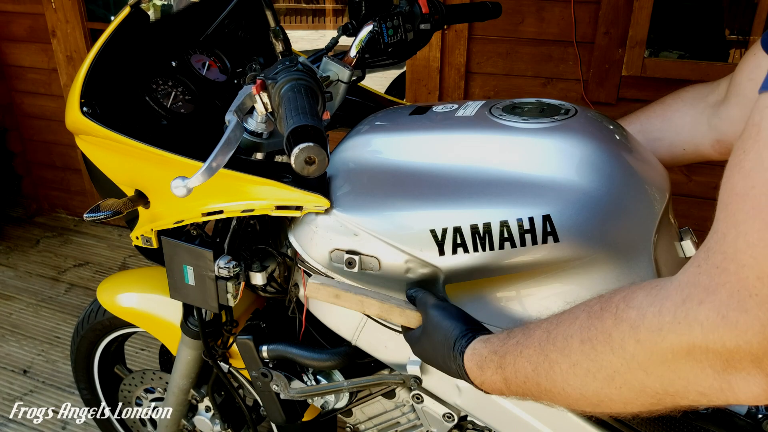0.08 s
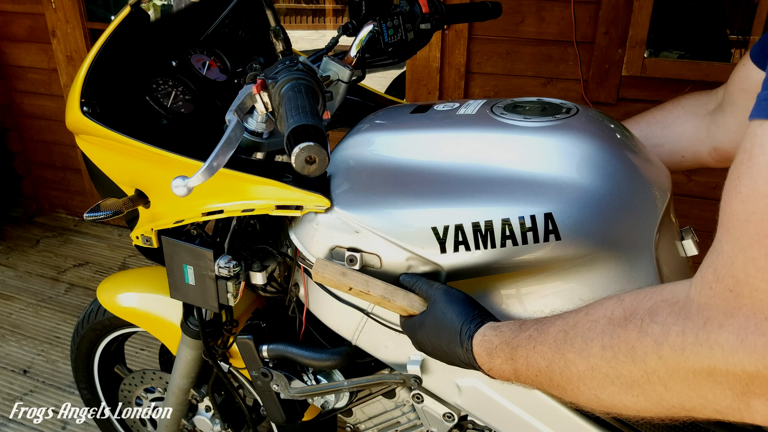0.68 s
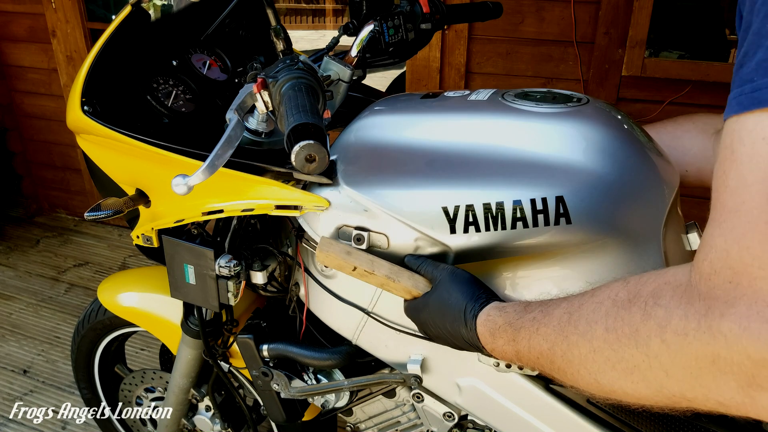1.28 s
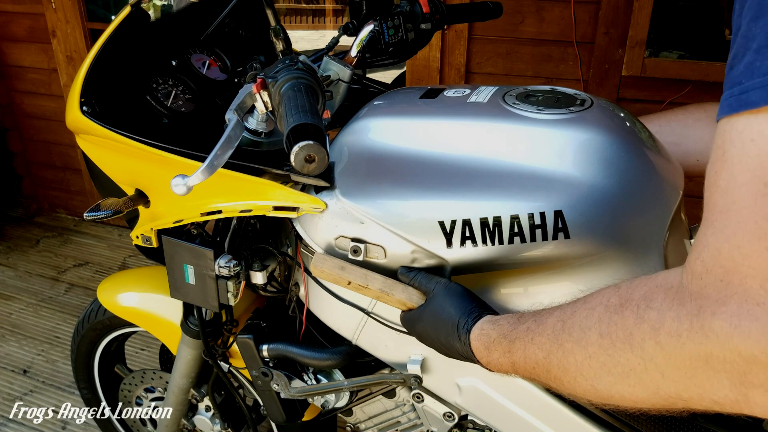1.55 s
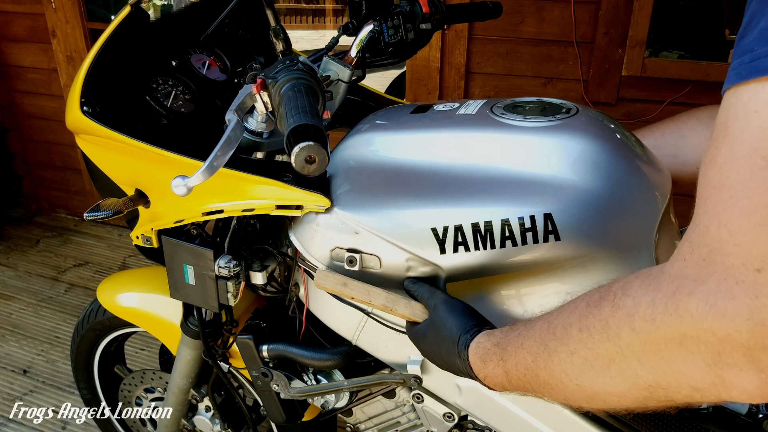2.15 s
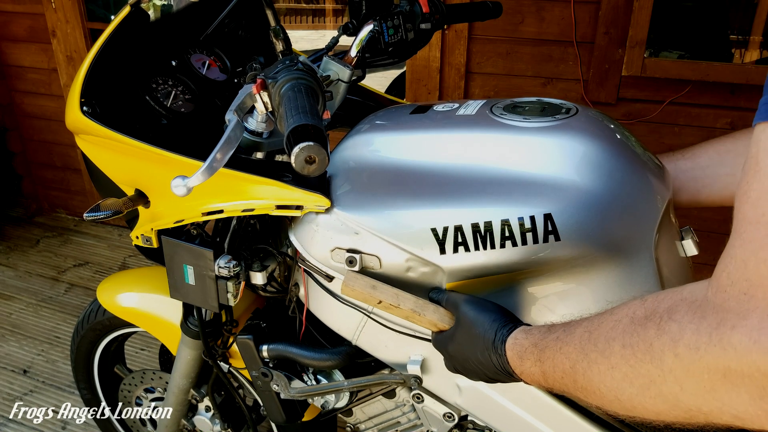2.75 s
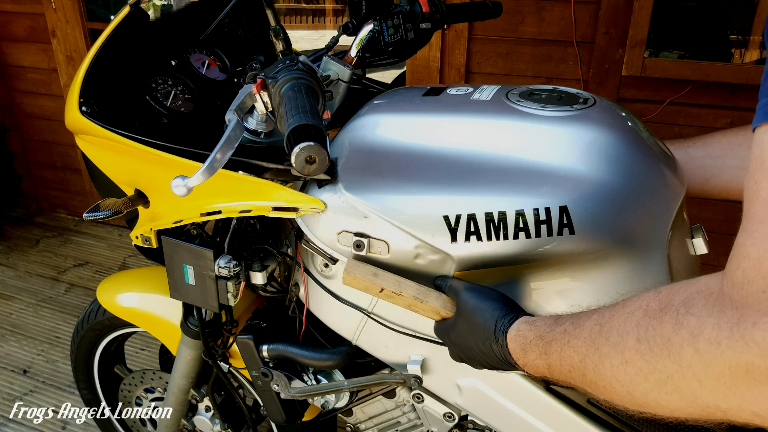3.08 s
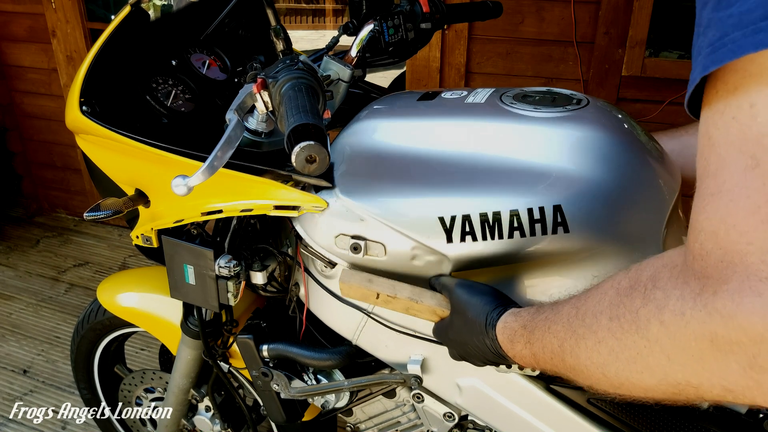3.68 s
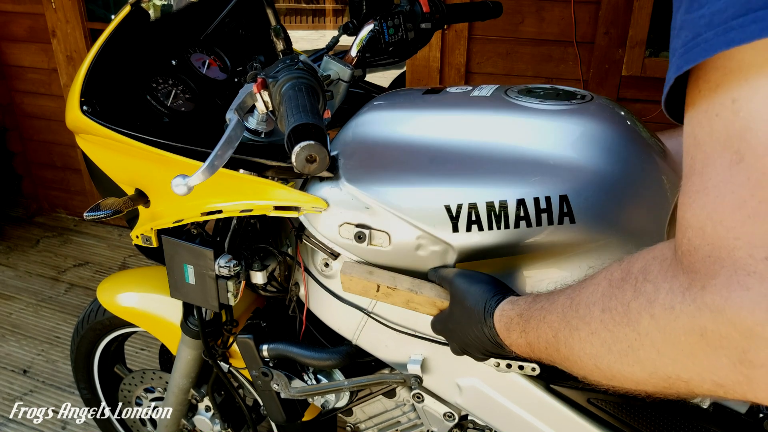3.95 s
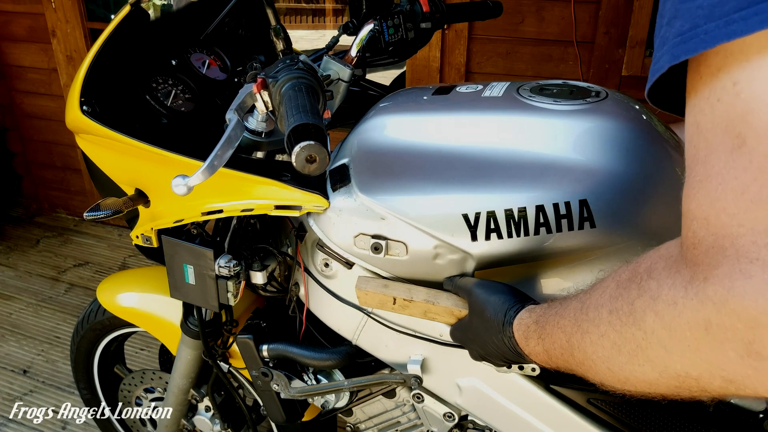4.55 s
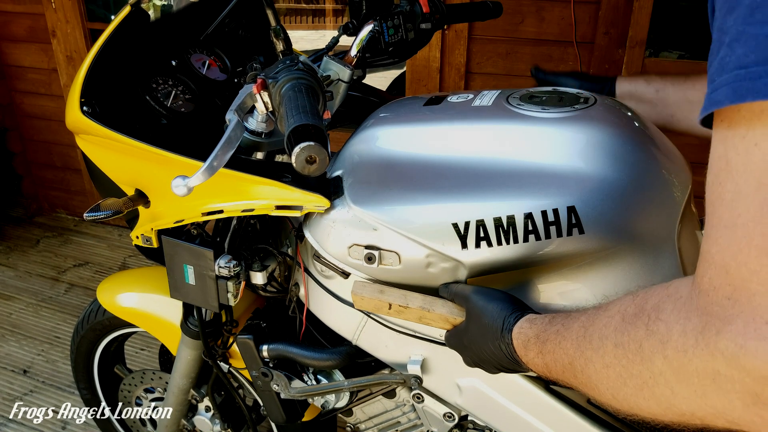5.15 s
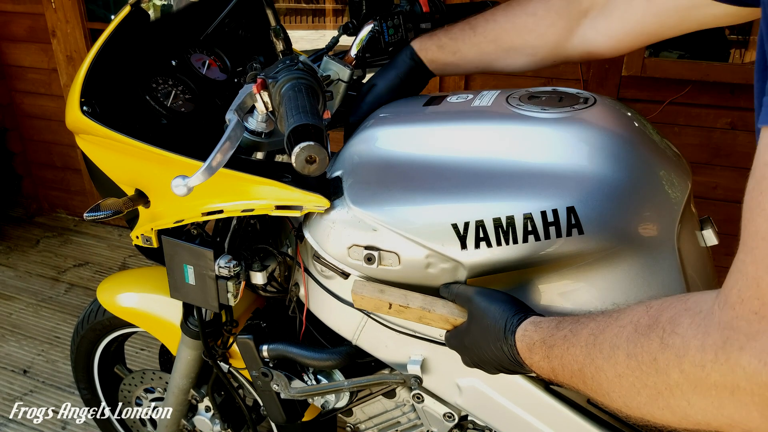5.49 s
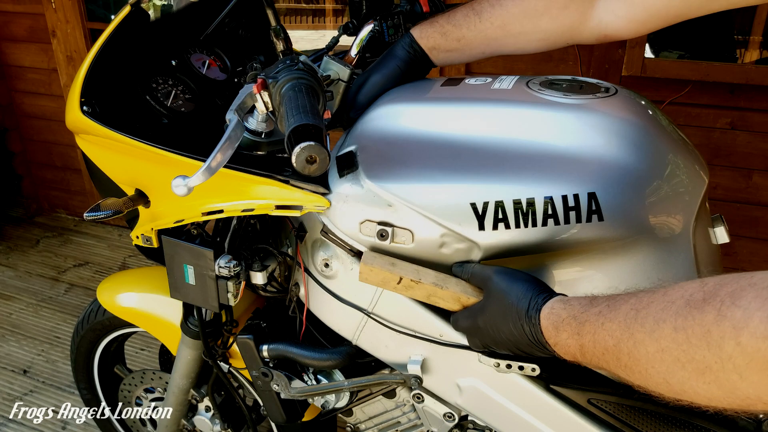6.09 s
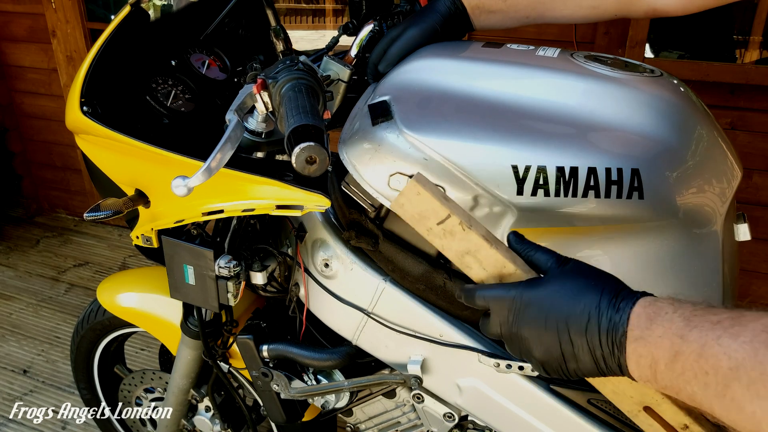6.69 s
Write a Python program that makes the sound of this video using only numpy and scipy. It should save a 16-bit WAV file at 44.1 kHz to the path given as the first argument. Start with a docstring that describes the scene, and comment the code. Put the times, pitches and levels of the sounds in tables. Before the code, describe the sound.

Close to a motorcycle outdoors, a steel fuel tank is rocked loose while a wooden stick is worked under it. Light hollow knocks, soft scrapes and a dull rubbing run along, with one short squeak early on. Past the middle the tank drops with a loud double boom, and a quick cluster of sharp knocks comes near the end. A distant bird whistles faintly at the start.

```python
"""Outdoors beside a wooden shed, a stereo microphone close to a motorcycle.
The steel fuel tank is rocked loose and lifted while a wooden prop stick is worked under its edge.
Stick and tank knock on the frame; the stick scrapes and squeaks once, and the shell rings.
The tank drags on its rubber mounts and drops on them with a hollow boom.
Far off, a small bird whistles at the start; still air lies under everything."""
import sys
import numpy as np
from scipy import signal
from scipy.fft import rfft, irfft, next_fast_len
from scipy.io import wavfile
from scipy.ndimage import uniform_filter1d

SR = 44100
rng = np.random.default_rng(int(sys.argv[2]) if len(sys.argv) > 2 else 0)


def put_to_file(sound):
    """Save the sound as 16-bit audio at rate SR, in the file named by the first command-line argument."""
    columns = np.atleast_2d(sound).T  # one column per channel
    safe = np.clip(columns, -1, 1)
    whole_steps = np.round(safe * 32767)
    wavfile.write(sys.argv[1], SR, whole_steps.astype(np.int16))


N = 300321
TIME = np.arange(N) / SR
EVENT_TIME = TIME[:SR * 3 // 5]  # the 0.6 s in which one contact sounds
EVENT_HZ = np.maximum(np.fft.rfftfreq(len(EVENT_TIME), 1 / SR), 1)
TOP_HZ = 16000


# colour of a blow, close up: (frequency [Hz], relative level [dB])
BLOW_SPECTRUM = [(15, -43), (60, -7.5), (120, -16.5), (200, 3), (340, 4.5), (520, 2), (800, 0.5),
                 (1400, -1), (1900, -3.5), (2800, -11.5), (4000, -8), (7000, -13), (10000, -16.5),
                 (15000, -16)]
# blows of stick and tank on the frame; body and crack are relative to the level:
# (time [s], level [dB], hollow body [dB], sharp crack [dB], pitch of the struck spot [Hz])
BLOWS = [(0.135, -32.5, 7, -18, 378), (0.576, -78, 24.5, -13, 390), (1.363, -32.5, 5.5, -21.5, 534),
         (1.711, -44, 8.5, -19.5, 700), (1.782, -43.5, 4.5, -33, 694), (1.814, -50, 1, 0, 875),
         (2.193, -42, 9.5, -22, 2580), (2.823, -48, -6.5, -23.5, 800), (2.972, -43.5, -0.5, -28, 603),
         (3.033, -42.5, 12, -11, 367), (3.125, -56, -8, 10.5, 970), (3.279, -50.5, 8, 6, 885),
         (3.625, -52, -5, 6, 900), (3.66, -29, 4, -28, 723), (3.746, -33.5, -1, -20, 317),
         (4.246, -47.5, 3, -20.5, 903), (4.364, -36.5, 9.5, -24.5, 300), (4.451, -18.5, -3, -9.5, 1680),
         (4.679, -43.5, 12.5, -6, 527), (4.702, -47, 20.5, -10, 515), (4.777, -49, 5.5, -10, 1700),
         (5.878, -50, 1, -12.5, 442), (5.974, -31.5, -2, -18, 1680), (6.304, -16, -5.5, -17.5, 462),
         (6.403, -40, 12.5, -11, 298), (6.524, -25, 1.5, -7, 569), (6.55, -17.5, 0, 0.5, 353),
         (6.571, -23.5, -4, -11, 350), (6.613, -21.5, -2, -2.5, 1980)]


def knocks(modes, crack_db=-1, tail_db=-18, tail_t60=0.47, body_rise_s=0.003):
    """Close up, each blow is a quickly damped clack of wood and frame, then the ring of the shell."""
    out, tone = np.zeros((2, N)), spectrum(BLOW_SPECTRUM, EVENT_HZ)
    for s, db, body, crack, hz in BLOWS:
        clacks = split(colour(stereo_noise(len(EVENT_TIME)), tone * contact_spot(hz, q=8, db=6)))
        rings = split(shell_ring(modes)) * undb([[-14], [-19], [-19]])
        # a firm blow holds the stick against the shell and dies fast; lighter ones ring on
        t60 = 0.13 * 2 ** ((-17 - db) / 40.5)
        # the duller the crack, the longer the contact; the hollow body answers a little late
        contact_s = 0.00013 * 2 ** (-crack / 4.5)
        rises = (contact_s + body_rise_s, contact_s, contact_s)
        gains = undb([body, 0, crack + crack_db])
        stretches = (1.15, 0.9, 0.6)  # the bass dies away more slowly than the treble
        for clack, ring, gain, rise, stretch in zip(clacks, rings, gains, rises, stretches):
            envelope = fade(t60 * stretch) + undb(tail_db) * fade(tail_t60 * np.sqrt(stretch))
            blow = (unit(clack) * envelope + ring) * (1 - np.exp(-EVENT_TIME / rise))
            onset_rms = np.sqrt(np.mean(blow[:, :SR // 50] ** 2))
            add(out, s, blow * (undb(db) * gain / onset_rms))
    return out


# the tank lands on its rubber mounts: (time [s], pitch [Hz], level [dB], t60 [s])
LANDINGS = [(0.149, 142.6, -27.5, 0.3), (1.827, 124, -37, 0.32), (2.25, 136, -37.5, 0.76),
            (3.672, 132, -30.5, 0.44), (4.358, 120.2, -7.5, 0.55), (4.452, 149.6, -9.5, 0.34),
            (4.641, 134.7, -35, 1), (4.697, 150, -19.5, 0.2)]


def booms(overtone_ratio=2.68, overtone_db=-4, rise_s=0.0079, choke_t60=0.19):
    """Soft rubber pushes the tank slowly, so only low panel modes answer; the next landing chokes them."""
    out = np.zeros(N)
    next_times = [row[0] for row in LANDINGS[1:]] + [TIME[-1]]
    for (s, hz, db, t60), next_s in zip(LANDINGS, next_times):
        phase = 2 * np.pi * hz * EVENT_TIME
        overtone = undb(overtone_db) * np.sin(overtone_ratio * phase) * fade(0.34 * t60)
        panel = np.sin(phase) * fade(t60) + overtone
        choke = fade(choke_t60, hold_s=next_s - s)
        add(out, s, undb(db) * panel * choke * (1 - np.exp(-EVENT_TIME / rise_s)))
    return out


# resonances of the steel shell: (frequency [Hz], relative level [dB], t60 [s])
SHELL_MODES = [(135, -11, .5), (214, -1, .6), (248, -4, .45), (275, -3, .45), (316, 0, .6), (357, 0, .35),
               (420, -2, .28), (473, -1, .42), (535, -7, .35), (620, -7, .22), (705, -4, .25),
               (812, -6, .2), (985, -11, .22), (1070, -6, .2), (1234, -10, .2), (1315, -9, .2),
               (1728, -5, .38), (1915, -4, .2), (2410, -9, .18), (3900, -11, .14)]


def tank_modes():
    """One fading sine for each mode of the shell."""
    return np.array([undb(db) * fade(t60) * np.sin(2 * np.pi * hz * EVENT_TIME)
                     for hz, db, t60 in SHELL_MODES])


def shell_ring(modes, scatter_db=4, detune=0.012):
    """Each contact stirs the modes of the tank differently, and its load bends their pitch."""
    strength, polarity = rng.standard_normal((2, len(modes)))
    ring = (np.sign(polarity) * undb(scatter_db * strength)) @ modes
    pitch_ratio = 1 + detune * rng.standard_normal()
    return np.interp(EVENT_TIME * pitch_ratio, EVENT_TIME, ring, right=0)


def contact_spot(hz, q, db, ripple_db=4.5, count=70):
    """Response of one contact spot: a main resonance among many small, irregular ones."""
    centres = np.geomspace(250, TOP_HZ, count)
    # high up the resonances crowd together and even out
    ripple = undb(ripple_db * rng.standard_normal(count) / np.hypot(1, centres / 5000))
    main = 1 + undb(db) / (1 + 1j * q * (EVENT_HZ / hz - hz / EVENT_HZ))
    return main * np.interp(EVENT_HZ, centres, ripple)


# course of the one squeak of wood on paint: (time [s], slip rate [Hz], level [dB])
SQUEAK_PATH = [(1.15, 420, -23), (1.153, 410.4, -17.5), (1.178, 449.3, -18.5), (1.199, 469.2, -22),
               (1.236, 470, -27.5), (1.268, 449, -31), (1.285, 446, -36.5), (1.359, 431, -38.5)]
# its harmonics at full grip: (multiple of the slip rate, relative level [dB])
SQUEAK_HARMONICS = [(1, 0.5), (2, -5), (3, -8.5), (4, -10.5), (5, -14.5), (6, -16.5), (8, -14.5)]


def squeak(jitter=0.067, roughness=0.32, full_grip_db=-21, panel_hz=1725, panel_q=70, panel_db=10):
    """The stick grips and slips in a fast, uneven rhythm and sets one panel singing."""
    times, rates, levels = np.transpose(SQUEAK_PATH)
    out, t = np.zeros(N), times[0] + EVENT_TIME
    noises = rng.standard_normal((1 + len(SQUEAK_HARMONICS), len(t)))
    wobble, *grips = (unit(uniform_filter1d(noise, SR // 400)) for noise in noises)
    slip_hz = np.interp(t, times, rates) * (1 + jitter * wobble)
    phase = 2 * np.pi * np.cumsum(slip_hz) / SR
    force = undb(np.interp(t, times, levels)) * np.clip((times[-1] - t) / 0.0058, 0, 1)
    # as the force drops the slips round off and the overtones go first
    edge = np.minimum(force / undb(full_grip_db), 1) ** 0.22
    tone = force * sum(undb(db) * edge ** (k - 1) * (1 + roughness * grip) * np.sin(k * phase)
                       for (k, db), grip in zip(SQUEAK_HARMONICS, grips))
    panel = signal.lfilter(*signal.iirpeak(panel_hz, panel_q, fs=SR), tone + 1e-18)
    add(out, times[0], tone + undb(panel_db) * panel)
    return out


# colour of scraping and dragging, close up: (frequency [Hz], relative level [dB])
SLIDE_SPECTRUM = [(15, -48), (60, -9), (130, 1), (300, 9), (500, 0.5), (800, -2.5), (1400, -4.5),
                  (2000, -7), (3000, -14), (6000, -8), (9000, -15.5), (13000, -12), (16000, -24)]
# scrapes of the stick along the tank; body and hiss are relative to the level:
# (time [s], length [s], level [dB], hollow body [dB], dry hiss [dB])
SCRAPES = [(0, 0.015, -67, 26, 6.5), (0.676, 0.15, -48, 5.5, -14.5), (0.875, 0.19, -49, 0, -15),
           (1.07, 0.13, -40.5, 1, 0), (1.419, 0.093, -47, 11.5, -5), (1.732, 0.1, -48, 16.5, -8),
           (2.073, .1, -51.5, 9, -12.5), (2.233, .035, -43, 11.5, -8.5), (2.364, 0.18, -62, 7.5, -4.5),
           (2.649, 0.1, -62, -6, -22), (2.744, 0.081, -57.5, -3, -2), (2.943, 0.14, -42.5, 2, -11.5),
           (3.125, 0.033, -44.5, -15, -8), (3.273, 0.075, -32.5, -3.5, -9.5),
           (3.624, 0.086, -34, -1.5, -3.5), (3.889, 0.073, -37, 3, -10), (3.988, .22, -50, 6, -8),
           (4.32, .1, -42.5, 4.5, -10.5), (4.889, 0.26, -62, -6, -9), (5.489, 0.055, -68, -0.5, 1.5),
           (5.689, 0.069, -62.5, 7.5, 0.5), (5.898, 0.27, -52, -5, -6.5), (6.227, 0.068, -44.5, 5, -9.5),
           (6.361, 0.12, -40, -4, -3.5)]


def scraping(modes, tick_db=2):
    """The grain of the stick rasps over the tank, at a new spot with every stroke."""
    out, tone = np.zeros((2, N)), spectrum(SLIDE_SPECTRUM, EVENT_HZ)
    for s, length, db, body, hiss in SCRAPES:
        force = stick_force(length, db)
        spot_hz = 1100 * 2 ** rng.uniform(-1.4, 1)
        response = tone * contact_spot(spot_hz, q=5, db=-1)
        rasp = rub(force, response, modes, bands_db=(body, 0, hiss),
                   slips_per_s=430, spread_db=0.54, slip_t60=0.075, ring_db=-7)
        add(out, s, rasp + undb(hiss + tick_db) * grit_ticks(force))
    return out


def stick_force(length, db, hardest_at=0.39, longest_bite_s=0.028, release_t60=0.21):
    """A firm scrape bites at once, a light one slides in; the force swells, eases and lets go."""
    bite_s = min(0.0047 * 2 ** ((-35 - db) / 5.5), longest_bite_s)
    swell_db = np.interp(EVENT_TIME / length, [0, hardest_at, 1], [-5.5, 0, -3])
    return undb(db + swell_db) * fade(release_t60, hold_s=length) * np.minimum(EVENT_TIME / bite_s, 1)


def rub(force, response, modes, bands_db, slips_per_s, spread_db, slip_t60, ring_db):
    """Surfaces catch and let go at random; every tiny slip rasps and keeps the shell ringing."""
    size = len(force)
    strengths = undb(spread_db * np.minimum(rng.exponential(size=size), 5))
    slips = (rng.random(size) < slips_per_s / SR) * strengths
    pole = np.exp(-2 * np.log(1000) / (slip_t60 * SR))
    slip_envelope = np.sqrt(signal.lfilter([1], [1, -pole], slips ** 2 + 1e-18))
    rasp = unit(colour(stereo_noise(size), response) * slip_envelope * force)
    ring = unit(signal.fftconvolve(rasp.mean(axis=0), shell_ring(modes))[:size])
    bands = split(rasp + undb(ring_db) * ring)
    return np.sqrt(np.mean(force ** 2)) * sum(undb(db) * unit(band) for db, band in zip(bands_db, bands))


def grit_ticks(force, per_s=30, scatter_db=3, t60=0.017, band_hz=(2000, 11000)):
    """Specks of grit snap under the stick: short, bright ticks that follow its force."""
    size = len(force)
    snaps = rng.random(size) < per_s / SR
    strengths = undb(scatter_db * np.clip(rng.standard_normal(size), -2, 2))
    tick = butter(stereo_noise(size) * fade(t60), 1, band_hz, "band")
    return signal.fftconvolve((snaps * strengths * force)[None], tick, axes=1)[:, :size]


# force of the tank on its mounts as it is worked loose: (time [s], level [dB])
DRAG_FORCE = [(0.0, -62.5), (0.19, -40.5), (0.41, -62.5), (0.68, -64), (0.84, -45.5), (1.37, -40.5),
              (1.53, -51), (2.32, -45), (2.6, -56.5), (2.92, -61), (3.17, -38), (3.47, -48), (3.64, -44),
              (3.82, -42), (4.24, -44), (4.62, -46), (5.08, -74.5), (5.4, -73.5)]


def dragging(modes):
    """The weight of the tank rubs on its mounts: a dull, hollow grumble with small irregular bumps."""
    size = next_fast_len(N)
    force = undb(np.interp(np.arange(size) / SR, *np.transpose(DRAG_FORCE)))
    response = spectrum(SLIDE_SPECTRUM, np.fft.rfftfreq(size, 1 / SR))
    return rub(force, response, modes, bands_db=(-2, -14, -27),
               slips_per_s=90, spread_db=2.0, slip_t60=0.36, ring_db=-5)[:, :N]


# a small bird, far from the microphone:
# (time [s], length [s], start pitch [Hz], middle pitch [Hz], end pitch [Hz], level [dB])
WHISTLES = [(0, .135, 4300, 4330, 4100, -61), (.195, .1, 5480, 5680, 5560, -57),
            (.315, .07, 5560, 5450, 5250, -57), (.28, .14, 4580, 4470, 4150, -59)]


def bird(waver=0.028):
    """Thin, wavering whistles swell and fade in the distance."""
    out = np.zeros(N)
    for s, length, start_hz, middle_hz, end_hz, db in WHISTLES:
        progress = np.linspace(0, 1, int(length * SR))
        glide_hz = np.interp(progress, [0, 0.5, 1], [start_hz, middle_hz, end_hz])
        wobble = unit(uniform_filter1d(rng.standard_normal(len(progress)), SR // 200))
        phase = 2 * np.pi * np.cumsum(glide_hz * (1 + waver * wobble)) / SR
        add(out, s, undb(db) * np.sin(np.pi * progress) * np.sin(phase))
    return out


def yard_echoes(x, wet_db=-11, t60=0.24, echoes_per_s=1500, gap_s=0.0026):
    """Decking, shed wall and the bike itself scatter a short patter of echoes back to the microphone."""
    size = len(EVENT_TIME)
    echo = stereo_noise(size, apart_hz=500, width=0.63) * fade(t60)
    echo *= (rng.random(size) < echoes_per_s / SR) & (EVENT_TIME > gap_s)
    echo = butter(echo / np.sqrt(np.sum(echo ** 2) / 2), 2, 330, "high")
    return x + undb(wet_db) * signal.fftconvolve(x, echo, axes=1)[:, :N]


# still outdoor air around the microphone: (frequency [Hz], relative level [dB])
AIR_SPECTRUM = [(12, -31), (28, -12), (42, 3.5), (60, 2), (120, -7.5), (300, -17.5), (600, -17.5),
                (1000, -12.5), (1600, -28), (4000, -32), (15000, -34.5)]


def still_air(db=-68.5):
    """The ambience by the shed: a faint, steady rumble with a trace of hiss."""
    return undb(db) * unit(colour(stereo_noise(N), spectrum(AIR_SPECTRUM, np.fft.rfftfreq(N, 1 / SR))))


def undb(db):
    """Decibels to gain."""
    return 10 ** (np.asarray(db) / 20)


def unit(x):
    """Scale to an rms of one."""
    return x / np.sqrt(np.mean(x ** 2))


def add(out, s, sound):
    """Mix a sound in at s seconds."""
    start = max(0, int(s * SR))
    part = sound[..., :N - start]
    out[..., start:start + part.shape[-1]] += part


def fade(t60, hold_s=0):
    """Hold at full level, then fall 60 dB every t60 seconds."""
    return np.exp(-np.log(1000) * np.maximum(EVENT_TIME - hold_s, 0) / t60)


def spectrum(points, hz):
    """Gain at each frequency from (frequency [Hz], level [dB]) points."""
    point_hz, db = np.transpose(points)
    return undb(np.interp(np.log(np.maximum(hz, 1)), np.log(point_hz), db))


def colour(x, gain):
    """Filter by one gain per frequency."""
    return irfft(rfft(x) * gain, x.shape[-1])


def butter(x, order, hz, kind):
    """Low-, band- or high-pass a sound."""
    return signal.sosfilt(signal.butter(order, hz, kind, fs=SR, output="sos"), x)


def split(x):
    """Bass, middle and treble of a sound."""
    return [butter(x, 4, 650, "low"), butter(x, 4, [650, 3300], "band"), butter(x, 4, 3300, "high")]


def stereo_noise(size, apart_hz=1200, width=0.97):
    """Noise that is alike in both channels in the bass and drifts apart higher up."""
    mid, side = rng.standard_normal((2, size))
    pole = np.exp(-2 * np.pi * apart_hz / SR)
    side = width * signal.lfilter([pole, -pole], [1, -pole], side)
    return np.array([mid + side, mid - side])


def scene(pan_db=0.5, lag_samples=5):
    """Tank close, bird far, over quiet air; the right microphone hears both a little later and louder."""
    modes = tank_modes()
    tank = knocks(modes) + scraping(modes) + dragging(modes) + booms() + squeak()
    left, right = yard_echoes(tank + bird())
    right = np.pad(right, (lag_samples, 0))[:N]
    return np.array([left * undb(-pan_db), right * undb(pan_db)]) + still_air()


def record(dry):
    """The camera's sound input rounds the highest peaks and cuts the top."""
    return signal.sosfilt(signal.ellip(10, 0.2, 80, TOP_HZ, fs=SR, output="sos"), np.tanh(dry))


dry = scene()
out = record(dry)
put_to_file(out)
```